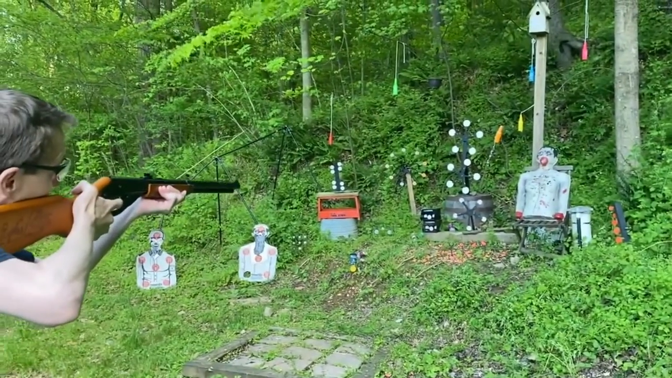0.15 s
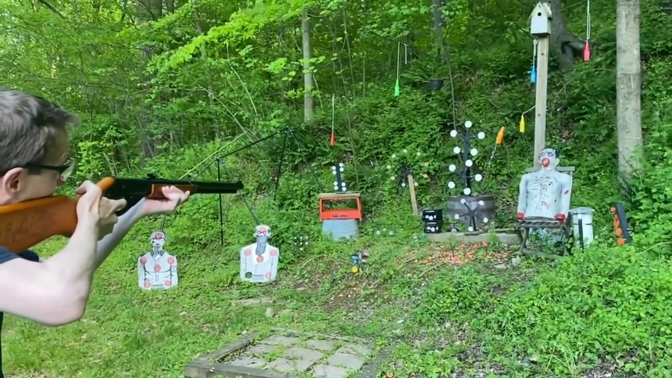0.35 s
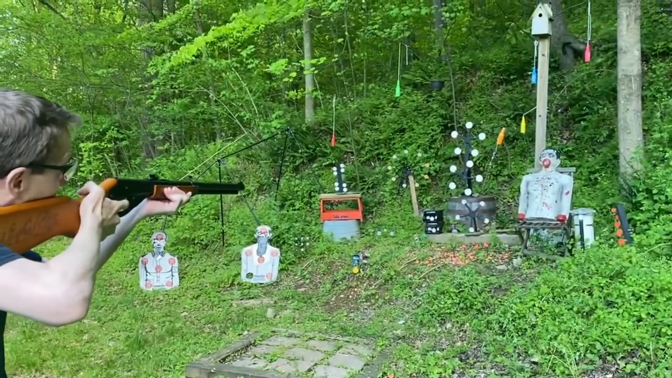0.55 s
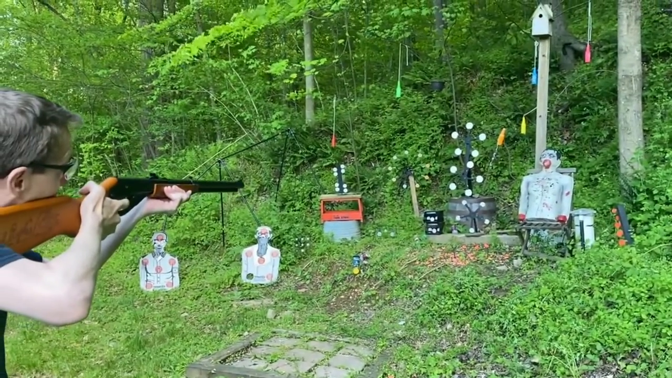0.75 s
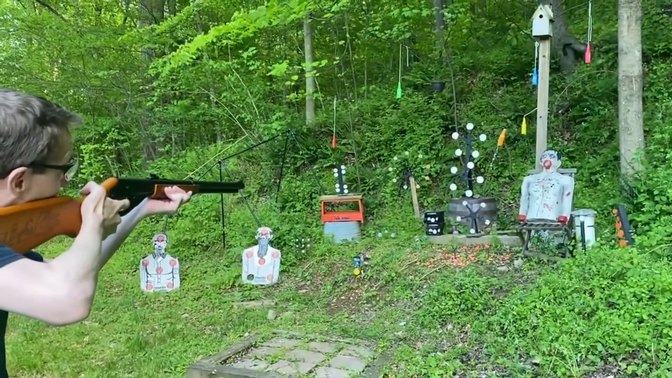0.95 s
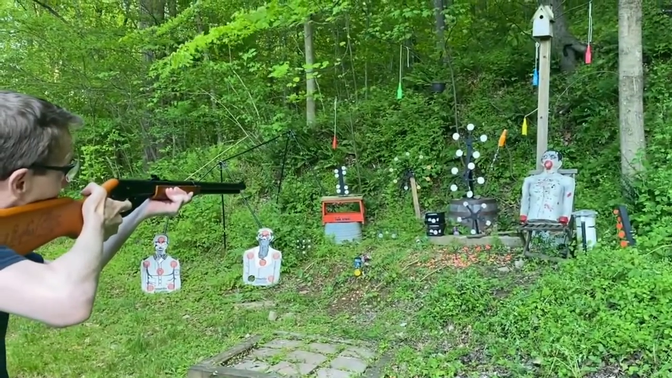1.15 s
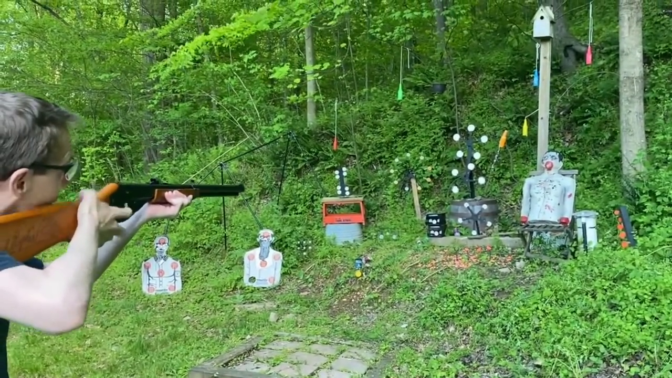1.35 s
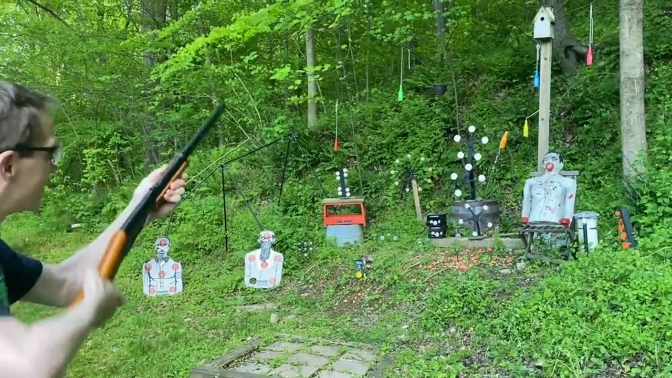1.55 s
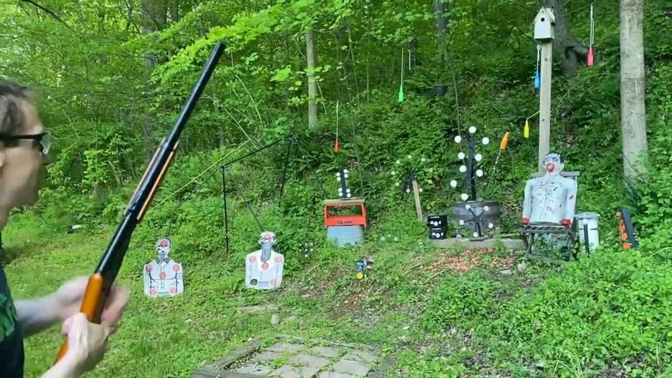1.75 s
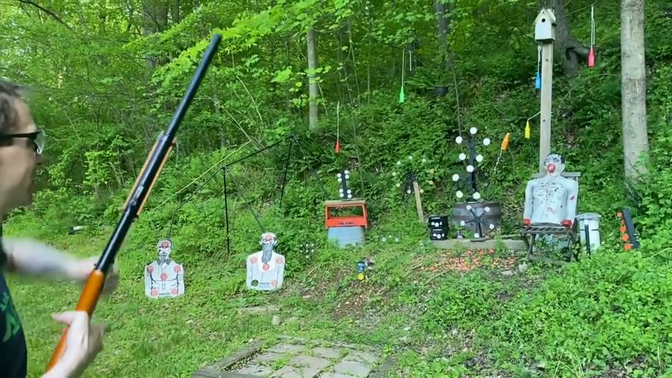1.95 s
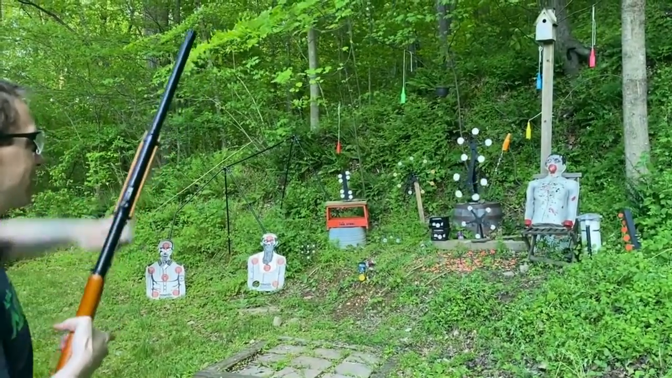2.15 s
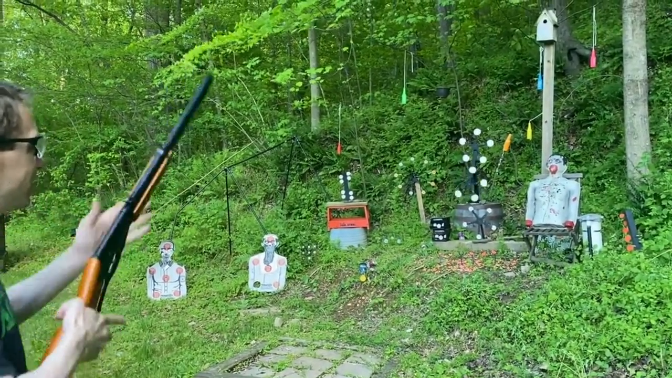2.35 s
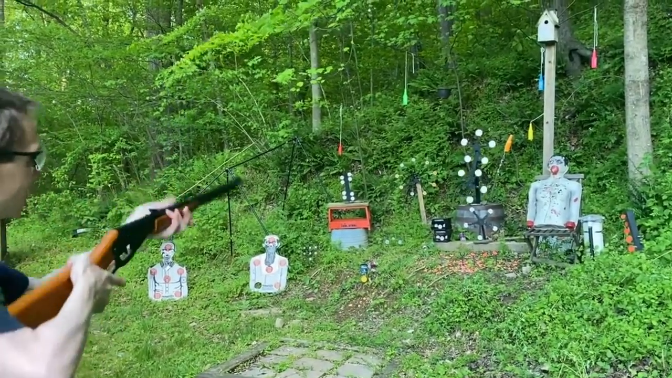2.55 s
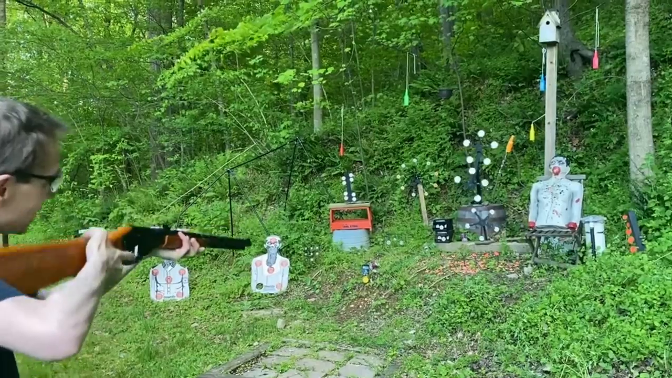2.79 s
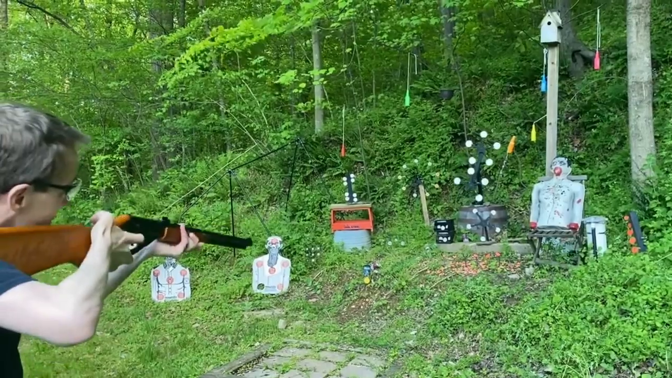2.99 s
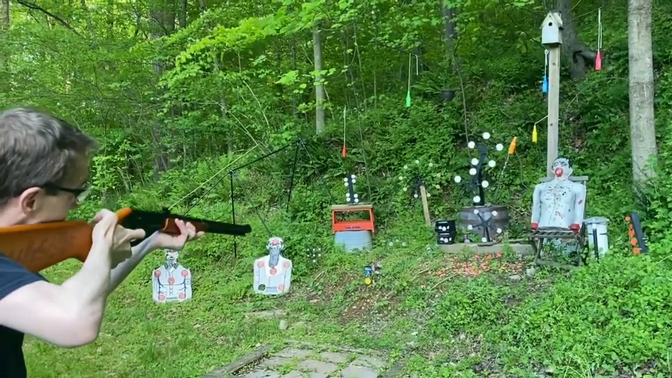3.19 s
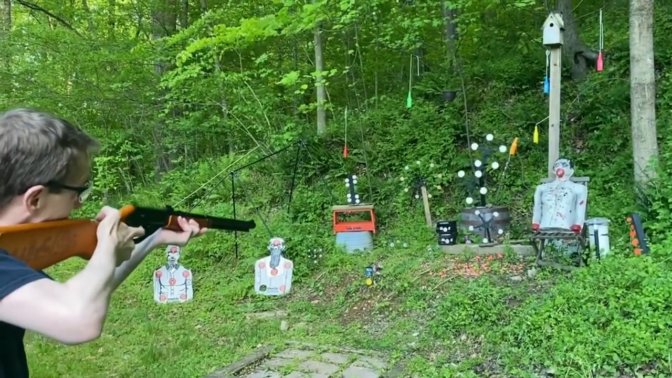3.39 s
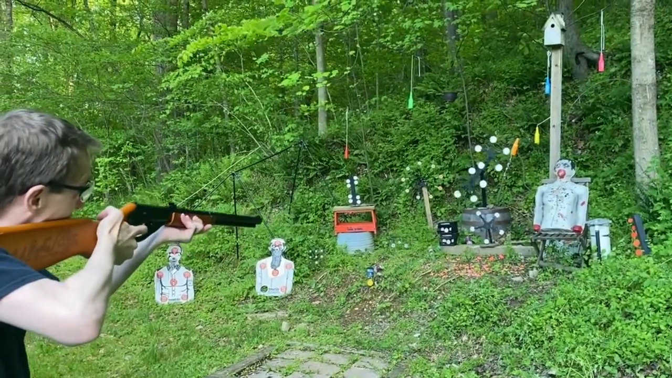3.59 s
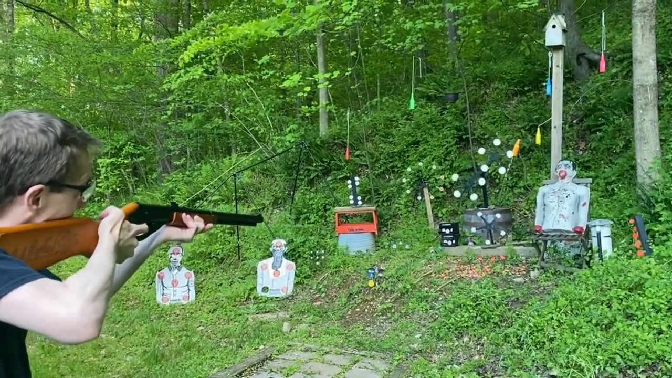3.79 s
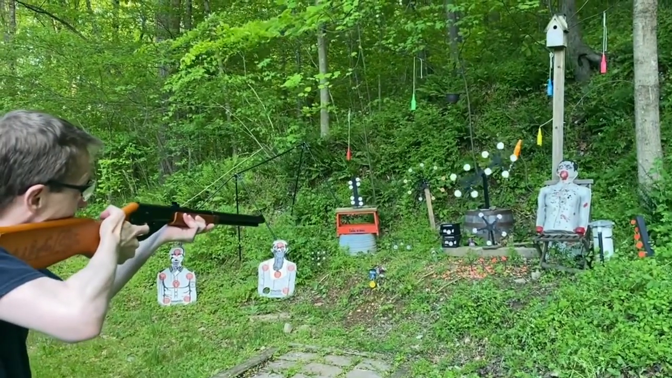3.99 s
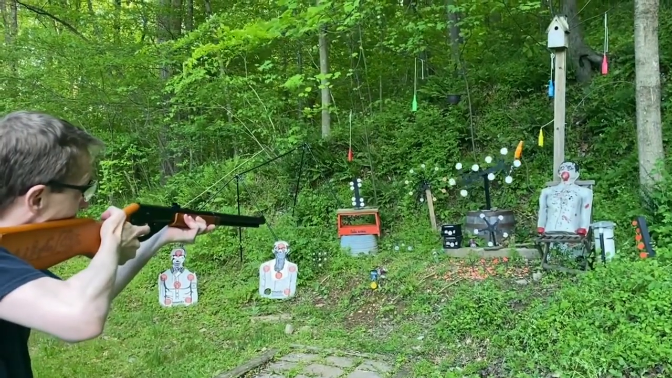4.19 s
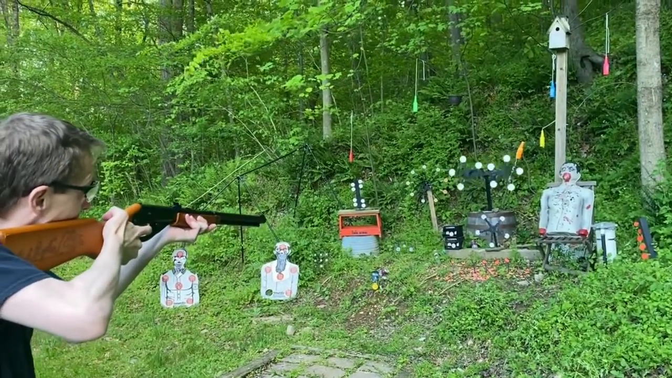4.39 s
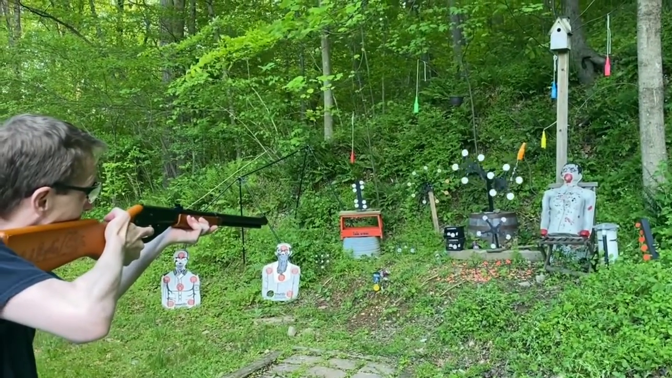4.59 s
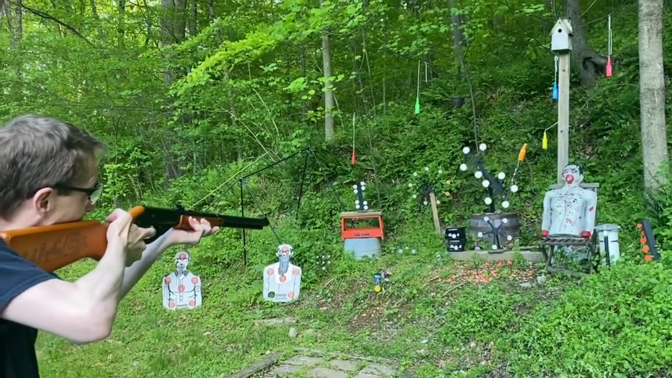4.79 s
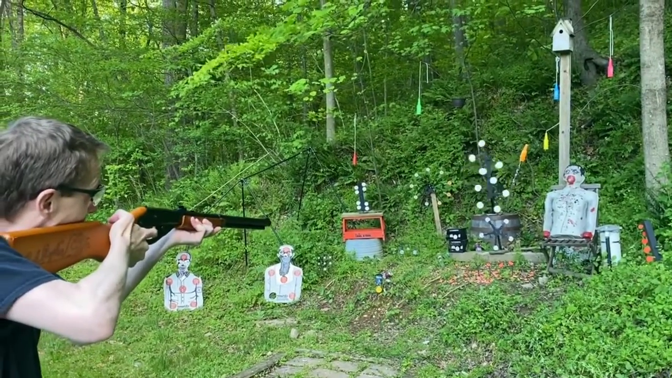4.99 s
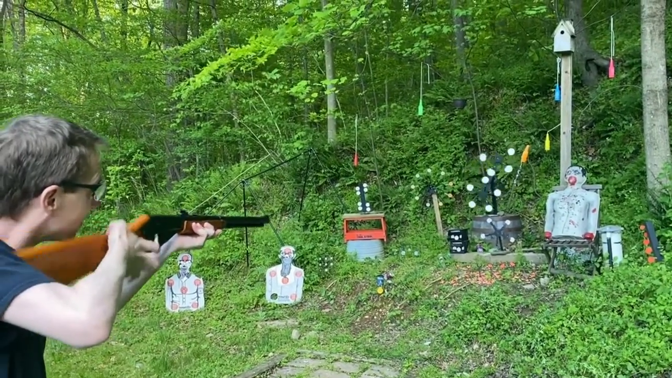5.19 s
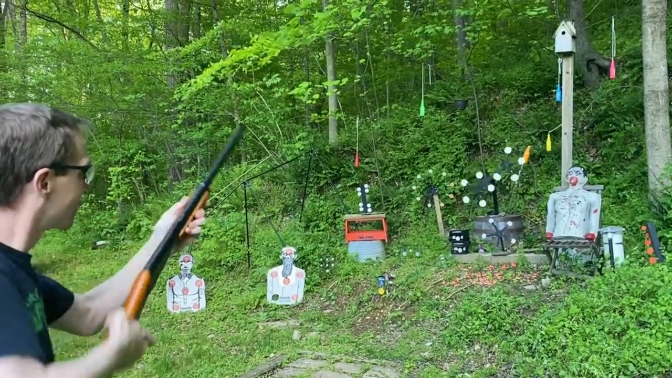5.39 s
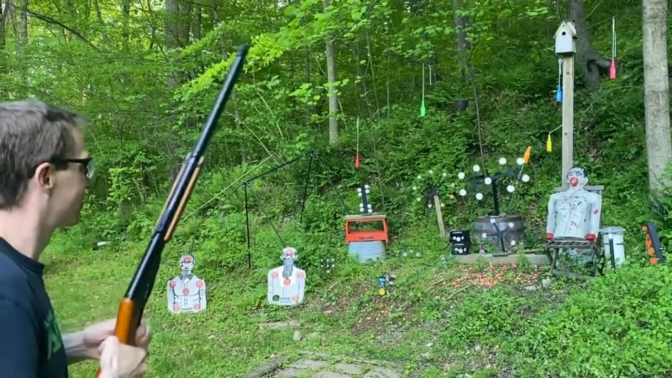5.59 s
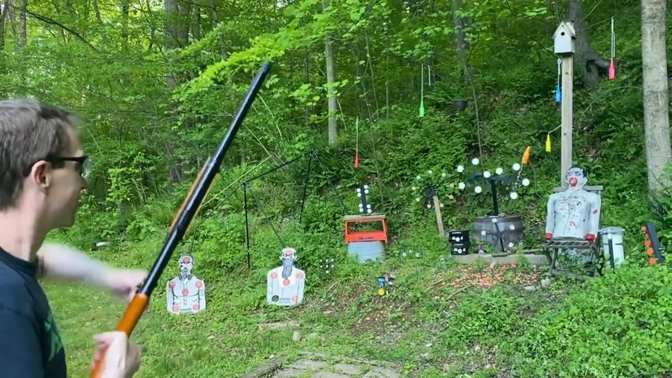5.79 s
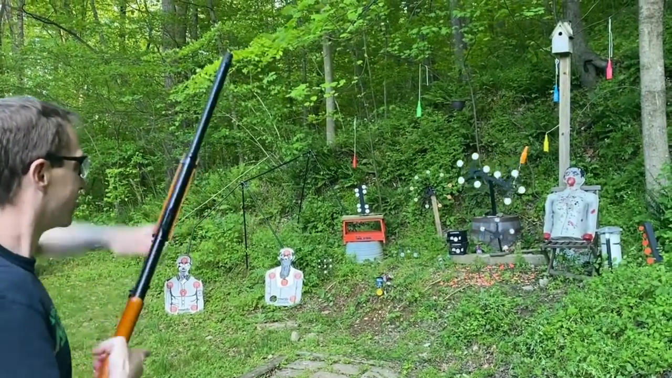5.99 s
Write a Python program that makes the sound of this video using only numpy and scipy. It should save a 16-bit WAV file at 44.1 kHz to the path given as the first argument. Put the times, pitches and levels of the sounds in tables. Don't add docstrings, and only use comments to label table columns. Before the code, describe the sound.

A close, dry spring-piston snap with a short low air pop is followed almost instantly by a clear metallic ping and loose hinge rattle. Then comes cocking: a hiss-like rattle of rolling pellets, a fast run of crisp steel clicks, and dull stock knocks. Faint traffic roar fills the pause. Another shot and a thinner, brighter ping follow, then pellets and ratchet clicks again. Open-air stereo pickup, rifle near left, targets farther ahead.

```python
import sys
import numpy as np
from scipy import signal
from scipy.fft import rfft, irfft
from scipy.io import wavfile
from scipy.ndimage import uniform_filter1d

SR = 44100
rng = np.random.default_rng(int(sys.argv[2]) if len(sys.argv) > 2 else 0)


def inscribe(sig):
    pcm = np.round(np.clip(np.atleast_2d(sig).T, -1, 1) * 32767)
    wavfile.write(sys.argv[1], SR, pcm.astype(np.int16))


def natural_amplitude(level_db):
    exponent = np.asarray(level_db, float) / 20
    return 10 ** exponent


N = 266805

# start_s, piston_db, pop_db
SHOT_TIMES = [
    (1.0943, -7, -2.5),
    (4.9557, -7, -3),
]
# pitch_hz, width_hz, level_db
RECEIVER = [(2700, 350, 2.5), (5300, 1100, 0.5), (7280, 1500, 0.5), (10300, 3800, -4.5), (14200, 1800, -9),
            (1300, 2200, 3)]
# pitch_hz, level_db, fade_60db_s, sign
AIR_POP = [(390, 0, .04, 1), (196, -1.5, 0.041, -0.941), (967, -6.5, 0.044, 1), (610, -4.5, 0.0252, 0.97),
           (109, -6, 0.049, 0.95)]

# pitch_hz, level_db, fade_60db_s
FIRST_PLATE = [(1782, 1.5, 0.28), (3478, -20.5, 0.4), (3741, -18, 0.3), (4330, -23, 0.13),
               (4786, -13.5, .3), (5930, -12, .45), (6095, -6, .12), (6810, -9, .12), (8027, -7.5, .2),
               (9650, -9.5, .16), (10950, -10, .15), (11360, -10, .3), (12720, -16, 0.316),
               (14717, -7, .14)]
SECOND_PLATE = [(3610, -2.5, 0.17), (4790, -4, 0.2), (6120, -3, .22), (6340, -4.5, .25), (6826, 2, 0.21),
                (7686, -6, 0.18), (9490, 0.5, .2), (10100, -4, .1), (11380, -7, .2), (14500, -7, .2)]
STEEL_BAR = [(1380, -3.5, 0.3), (3720, -10.5, .4), (5980, -11, .4), (264, -3, 0.092)]
THIRD_PLATE = [(3612, -23.5, 0.23), (4068, -8, 0.27), (4091, -14, 0.36), (5502, -7, 0.12), (5545, -21, 0.9),
               (6690, -16, 0.1), (7750, -23.5, 0.14), (8193, -23.5, 0.17), (9970, -4, 0.17),
               (10730, -9.5, 0.17), (11420, -12, 0.3), (12900, -12.5, 0.29), (13040, -19.5, 0.14),
               (13860, -13, 0.22)]
# start_s, ring_db, crack_db
FIRST_PLATE_BLOWS = [
    (1.1986, -1.5, -9),
    (1.224, -14, -15),
]
SECOND_PLATE_BLOWS = [
    (1.3864, -14.5, -9.5),
    (1.421, -17, -24),
    (1.429, -17, -16),
    (1.500, -26.5, -25),
    (1.515, -27.5, -23),
    (1.561, -31.5, -19.5),
]
BAR_BLOWS = [
    (1.279, -11.5, -17),
    (1.3863, -17.5, -26.5),
]
THIRD_PLATE_BLOWS = [
    (5.0476, -2.5, -6),
    (5.063, -28, -12),
    (5.2, -31.5, -23),
    (5.212, -26, -20),
]
# full_from_s, full_until_s, level_db, rise_20db_s, fall_20db_s
HINGE_CHATTER = [
    (1.2, 1.23, -21.5, .002, .06),
    (1.26, 1.54, -31.5, .02, .17),
    (1.39, 1.395, -23.5, .01, .06),
    (1.428, 1.435, -18.5, .03, .06),
    (1.515, 1.525, -30, .06, .1),
    (5.05, 5.06, -20, .002, .08),
    (5.11, 5.12, -38, .02, .35),
    (5.215, 5.225, -40, .06, .06),
]

# start_s, peak_db, brightness_db
LEVER_TEETH = [(1.9627, -8, -4.5), (1.98, -3, -3.5), (2.0017, -3, 1), (2.0106, -.5, 3), (2.021, -1, 3.5),
               (2.029, -2, 0), (2.0394, 2, 3), (2.0574, -5.5, 4.5), (2.0649, -1.5, 3.5), (2.279, -9.5, -1),
               (5.78, -9.5, 1.5), (5.8002, -3, -6), (5.8276, -7, -1), (5.842, -6, 2), (5.8555, 1, 3),
               (5.8675, -3, 3.5), (5.8783, 0, 2.5), (5.903, -2, 3.5)]
# start_s, peak_db, brightness_db
LOOSE_TICKS = [(1.9056, -19.5, -3), (1.933, -26, -5.5), (2.127, -20, 0), (2.1726, -18.5, -4),
               (2.2001, -20, -2.5), (2.2134, -14.5, 1.5), (2.2536, -17.5, -0.5), (2.3724, -24.5, -2),
               (2.382, -13.5, 1), (2.4194, -30.5, 0), (2.4464, -36, -3), (3.0094, -35, -1.5),
               (3.028, -30.5, 4), (3.0544, -34, 0), (3.1452, -21, -4.5), (3.4581, -22, -6),
               (5.705, -19, -6), (6.0172, -22.5, -1), (6.032, -13, 3.5)]
# pitch_hz, level_db (per Hz)
STEEL_TICK = [(240, -44), (400, -13.5), (865, -8), (1460, -1), (1790, -2.5), (2180, -6), (7400, -2),
              (9040, -7), (10400, -3.5), (16000, -16)]
TOOTH_FADE_S, TICK_FADE_S = 0.018, 0.016

# full_from_s, full_until_s, level_db, rise_20db_s, fall_20db_s
PELLET_ROLLS = [(1.62, 1.64, -32, .04, .3), (1.79, 1.81, -6.5, .055, .018), (1.84, 1.95, -39, .03, .1),
                (2.01, 2.05, -20, .016, .1), (2.068, 2.074, -17, .05, .05), (2.21, 2.23, -28, .15, .2),
                (2.385, 2.395, -39, .07, .14), (2.505, 2.95, -32, .02, .05), (2.6, 2.7, -28, .15, .2),
                (3.0, 3.05, -46, .1, .03), (5.40, 5.5, -30, .025, .1), (5.575, 5.625, -10.5, .1, .03),
                (5.71, 5.73, -31, .09, .05), (5.85, 5.925, -20, .07, .07), (6.04, 6.06, -33, .07, .1)]
# pitch_hz, level_db (per Hz)
MAGAZINE_TUBE = [(800, -24.5), (2000, 2), (3600, -7), (5000, -4), (7500, 1), (8300, -6), (10300, 1.5),
                 (12000, -5.5), (14700, -3.5), (16000, -28)]
BRIGHT_PER_DB, PLAIN_DB = 0.25, -31

# start_s, level_db, pitch_hz, fade_60db_s
WOOD_KNOCKS = [(1.279, -13, 1900, .025), (1.279, -14, 900, .03), (2.28, -13, 5250, .012),
               (1.981, -7, 3250, .015), (1.982, -9, 1700, .015), (5.8, -10, 1800, .016),
               (5.2, -20, 3500, .02), (1.9814, -2, 1070, .025), (1.981, -2.5, 2700, .02),
               (2.2796, -6, 3300, 0.016), (2.28, -9, 2660, 0.017), (2.28, -9.5, 4400, .015),
               (5.099, -21, 1602, 0.077), (5.222, -5.5, 1220, 0.024), (5.8, -3.5, 1057, .025),
               (5.80, -12, 2612, 0.024), (1.984, -16.5, 450, .04), (5.802, -18, 448, .04)]

# pitch_hz, level_db (per Hz)
ROAD_TONE = [(15, -43.5), (25, -20), (60, 10), (219, -14), (250, -6), (344, -13), (392, -9), (599, -10.5),
             (966, -1.5), (2500, -16), (3100, -25.5), (7030, -44), (8240, -48.5), (9170, -67.5),
             (10200, -50), (14000, -78)]
# time_s, level_db
TYRE_ROAR = [(0.0, -25.5), (0.5, -24.5), (1.3, -26.5), (1.9, -25.5), (2.7, -26.5), (3.5, -27.5),
             (4.5, -26.3), (5.3, -28.5), (5.7, -25), (6.05, -28)]
# start_s, end_s, pitch_hz, level_db
ENGINES = [
    (3.15, 6.91, 250, -40),
    (3.44, 5.0, 93, -42),
    (5.0, 5.58, 502, -39.5),
    (3.8, 4.9, 408, -39),
]
# pitch_hz, likeness (0 to 1)
ROAD_LIKENESS = [(40, .8), (150, 0.9), (300, 0.82), (700, 0.59), (1500, 0.5), (2000, 0.29), (2600, 0.52),
                 (5500, 0.52), (7000, .85), (12000, .8)]
RUMBLE_DB = -26
# middle_s, half_length_s, lift_db
HEAVY_VEHICLES = [
    (2.95, .35, 3.5),
    (4.1, .5, 3),
]
# middle_s, half_length_s, lift_db, above_hz
CLOSER_CAR = (2.75, .85, 4.5, 1500)

# pitch_hz, fade_60db_s
WOOD_ECHO = [(200, .12), (1000, 0.37), (4000, 0.31), (15000, 0.13)]
# pitch_hz, lead_radians
SIDE_LEAD = [(0, 0), (1300, 2.5), (2350, 0.9), (2600, 0.8), (6000, .8), (8000, .05)]
# pitch_hz, lead_radians
SPACING_LEAD = [(7300, 0), (9000, -3.14), (10800, -6.1), (11600, -6.4), (13300, -9.42), (15000, -12.3),
                (16500, -13)]


def shot(piston_db, pop_db):
    t = np.arange(9000) / SR
    slam_fade = natural_amplitude(-60 * t / 0.034) + natural_amplitude(-3.5 - 60 * t / 0.3)
    shake = rng.standard_normal(len(t)) * np.minimum(t / 0.0028, 1) * slam_fade
    body = np.zeros(len(t))
    for hz, width_hz, db in RECEIVER:
        body += natural_amplitude(db) * signal.lfilter(*signal.iirpeak(hz, hz / width_hz, SR), shake)
    late = np.maximum(t - 0.0092, 0)
    pop = np.zeros(len(t))
    for hz, db, fade_s, sign in AIR_POP:
        pop += sign * natural_amplitude(db - 60 * late / fade_s) * np.sin(2 * np.pi * hz * late)
    return np.array([natural_amplitude(piston_db + 4) * body, natural_amplitude(pop_db) * pop])


def blow(modes, ring_db, crack_db):
    t = np.arange(20000) / SR
    out = natural_amplitude(crack_db - 60 * t / 0.023) * rng.standard_normal(len(t))
    flutter = rng.standard_normal((len(modes), len(t)))
    flutter = evened(uniform_filter1d(uniform_filter1d(flutter, 500), 500))
    spots = rng.random(len(modes))
    for (hz, db, fade_s), spot, swing in zip(modes, spots, flutter):
        level_db = ring_db + db + 3.0 * (spot - 2.2) + 2.5 * swing
        out += natural_amplitude(level_db - 60 * t / fade_s) * np.sin(2 * np.pi * hz * t + 0.3 * swing)
    return out


def kept_ringing(modes, chatter):
    ring = np.zeros(N)
    for hz, db, _ in modes:
        ring += natural_amplitude(0.53 * db) * signal.lfilter(*signal.iirpeak(hz, hz / 70, SR), chatter)
    return evened(ring)


def jangle():
    chatter = evened(taps(2500, 3.6))
    after_first_shot = np.arange(N) / SR < 3
    rings = np.where(after_first_shot, kept_ringing(SECOND_PLATE, chatter), kept_ringing(THIRD_PLATE, chatter))
    rattle = colour(chatter, STEEL_TICK, 0.67)
    return natural_amplitude(swells(HINGE_CHATTER)) * (rattle + natural_amplitude(-9) * rings)


def lever():
    out, t = np.zeros(N), np.arange(3000) / SR
    for ticks, fade_s in (LEVER_TEETH, TOOTH_FADE_S), (LOOSE_TICKS, TICK_FADE_S):
        shape = natural_amplitude(-60 * t / fade_s) * np.minimum(t / 0.0006, 1)
        for s, db, tilt_db in ticks:
            scrape = rng.standard_normal(len(t)) * shape
            add(out, s, natural_amplitude(db - 3) * colour(scrape, STEEL_TICK, tilt_db))
    return out


def pellets():
    level_db = swells(PELLET_ROLLS)
    hits = taps(5000, 2.9)
    dull, bright = colour(hits, MAGAZINE_TUBE, -0.5), colour(hits, MAGAZINE_TUBE, 5.2)
    share = np.clip(0.5 + BRIGHT_PER_DB * (level_db - PLAIN_DB) / 8, 0, 1)
    return natural_amplitude(level_db) * evened(dull + share * (bright - dull))


def knocks():
    out, t = np.zeros(N), np.arange(3000) / SR
    for s, db, hz, fade_s in WOOD_KNOCKS:
        tone = np.sin(2 * np.pi * hz * t) * np.minimum(t / 0.00075, 1)
        add(out, s, natural_amplitude(db - 60 * t / fade_s) * tone)
    return out


def road():
    frames, hz = N // 256 + 5, np.fft.rfftfreq(1024, 1 / SR)
    a, b, c, d, patches = rng.standard_normal((5, 513, frames))
    patches = evened(uniform_filter1d(uniform_filter1d(patches, 10, 0), 16, 1))
    t, pitch = np.arange(frames) * 256 / SR, hz[:, None]

    rumble_db = RUMBLE_DB
    for s, half_s, db in HEAVY_VEHICLES:
        rumble_db = rumble_db + db * np.exp(-((t - s) / half_s) ** 2)
    low = 1 / (1 + (pitch / 330) ** 4)
    level_db = low * rumble_db + (1 - low) * np.interp(t, *np.transpose(TYRE_ROAR))
    s, half_s, db, above_hz = CLOSER_CAR
    car_band = 1 / (1 + (above_hz / (pitch + 1)) ** 4) / (1 + (pitch / 4000) ** 4)
    level_db += db * np.exp(-((t - s) / half_s) ** 2) * car_band

    same = np.clip(read(ROAD_LIKENESS, hz), -1, 1)[:, None]
    left = a + 1j * b
    right = same * left + np.sqrt(1 - same ** 2) * (c + 1j * d)
    z = np.array([left, right]) * natural_amplitude(read(ROAD_TONE, hz)[:, None] + 1.58 * patches + level_db - 9)
    out = signal.istft(z, nperseg=1024, noverlap=768)[1][:, :N]

    t = np.arange(N) / SR
    for start, end, drone_hz, db in ENGINES:
        waver = evened(uniform_filter1d(rng.standard_normal(N), 9000))
        swell = np.sin(np.pi * np.clip((t - start) / (end - start), 0, 1))
        drone = np.sin(2 * np.pi * np.cumsum(drone_hz + 2.5 * waver) / SR)
        out += natural_amplitude(db + 2.5 * waver) * swell * drone
    return out


def outdoors(x, near_db, far_db):
    hz, t, z = signal.stft(rng.standard_normal((2, SR // 2)), SR, nperseg=128)
    fade = natural_amplitude(-60 * t / read(WOOD_ECHO, hz)[:, None])
    far = signal.istft(z * fade, SR, nperseg=128)[1]
    echo = natural_amplitude(far_db) * far / np.linalg.norm(far[0])
    sparse = rng.random((2, 300)) < 0.05
    near = rng.standard_normal((2, 300)) * sparse * natural_amplitude(-np.arange(300) * 0.044)
    echo[:, 20:320] += natural_amplitude(near_db) * near / np.linalg.norm(near, axis=1, keepdims=True)
    echo[:, 0] = 1
    return signal.fftconvolve(x[None], echo, axes=1)[:, :N]


def pair(x, side):
    hz = np.fft.rfftfreq(N, 1 / SR)
    lead = side * np.interp(hz, *np.transpose(SIDE_LEAD)) + np.interp(hz, *np.transpose(SPACING_LEAD))
    return irfft(rfft(x) * np.exp([0.5j * lead, -0.5j * lead]), N)


def taps(per_s, spread_db):
    size = natural_amplitude(spread_db * np.minimum(rng.exponential(1, N), 5))
    return size * (rng.random(N) < per_s / SR) * rng.choice([-1, 1], N)


def swells(rows):
    t, power = np.arange(N) / SR, np.zeros(N)
    for start, end, db, rise_s, fall_s in rows:
        away = np.maximum(np.maximum((start - t) / rise_s, (t - end) / fall_s), 0)
        power += natural_amplitude(2 * (db - 20 * away))
    return 10 * np.log10(power + 1e-12)


def colour(x, points, tilt_db=0):
    hz = abs(np.fft.fftfreq(1024, 1 / SR))
    log_gain = np.log(natural_amplitude(read(points, hz) + tilt_db * np.log2((hz + 500) / 6000)))
    response = np.fft.ifft(np.exp(log_gain - 1j * signal.hilbert(log_gain).imag)).real
    return signal.oaconvolve(x, response[:512] / np.linalg.norm(response))[:len(x)]


def read(points, hz):
    f, value = np.transpose(points)
    return np.interp(np.log(hz + 1), np.log(f + 1), value)


def evened(x):
    return x / np.sqrt(np.mean(x ** 2) + 1e-20)


def add(mix, s, sound):
    part = mix[..., round(s * SR):][..., :sound.shape[-1]]
    part += sound[..., :part.shape[-1]]


def scene():
    shots, steel = np.zeros((2, N)), jangle()
    for s, *levels in SHOT_TIMES:
        add(shots, s, shot(*levels))
    targets = ((FIRST_PLATE, FIRST_PLATE_BLOWS), (SECOND_PLATE, SECOND_PLATE_BLOWS),
               (STEEL_BAR, BAR_BLOWS), (THIRD_PLATE, THIRD_PLATE_BLOWS))
    for modes, blows in targets:
        for s, *levels in blows:
            add(steel, s, blow(modes, *levels))
    body, pop = shots
    rifle = outdoors(body, -6.5, -8.5) + outdoors(pop, -22.5, -13)
    rifle += natural_amplitude(1) * outdoors(lever() + pellets(), -9, -9)
    rifle += natural_amplitude(1.5) * outdoors(knocks(), -13, -19)
    return pair(rifle + road(), 0.84) + pair(outdoors(steel, -9, -7), -0.19)


def joint_stereo(x):
    hz, t, z = signal.stft([x[0] + x[1], x[0] - x[1]], SR, nperseg=1024)
    power = uniform_filter1d(uniform_filter1d(abs(z) ** 2, size=9, axis=1), size=3, axis=2)
    weak = (power < power[::-1] * natural_amplitude(2 * -5.0)) & (hz[:, None] > 3300)
    both, apart = signal.istft(z * ~weak, SR, nperseg=1024)[1][:, :N] / 2
    return np.array([both + apart, both - apart])


def roll_off(x):
    return signal.sosfilt(signal.butter(12, 16320, fs=SR, output="sos"), x)


def record(dry):
    bass_cut = signal.butter(2, 42, "high", fs=SR, output="sos")
    stereo = joint_stereo(signal.sosfilt(bass_cut, dry))
    return roll_off(np.clip(stereo, -1, 1))


dry = scene()
out = record(dry)
inscribe(out)
```